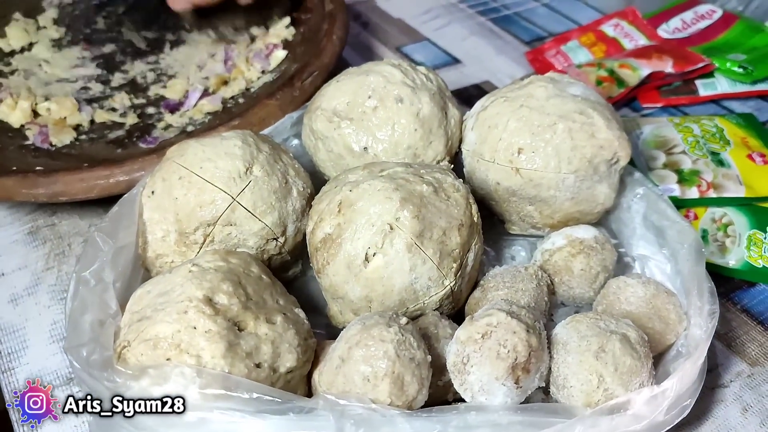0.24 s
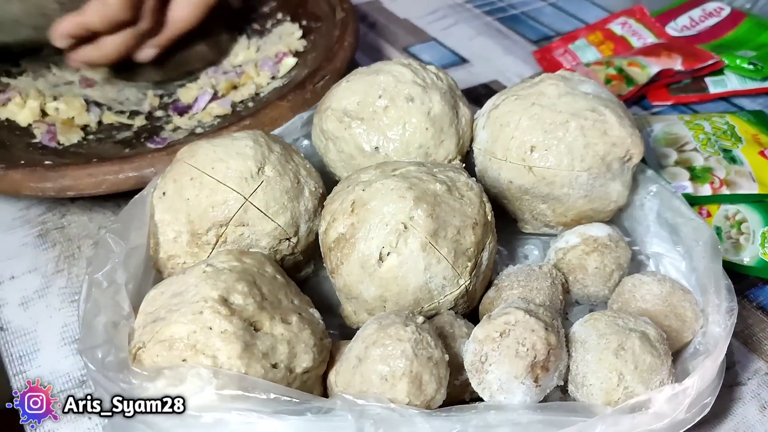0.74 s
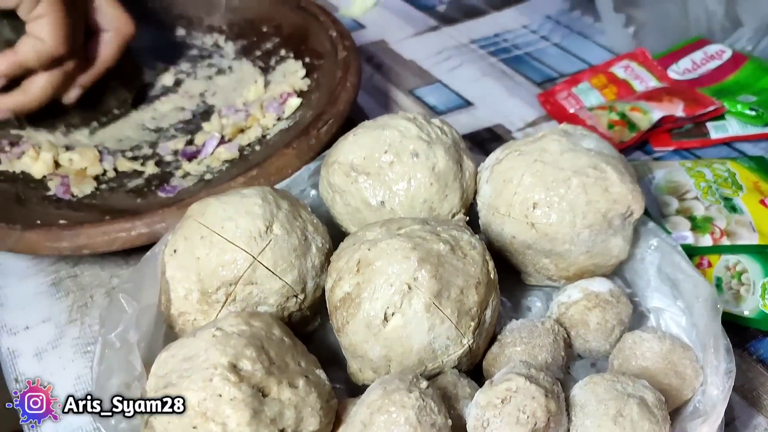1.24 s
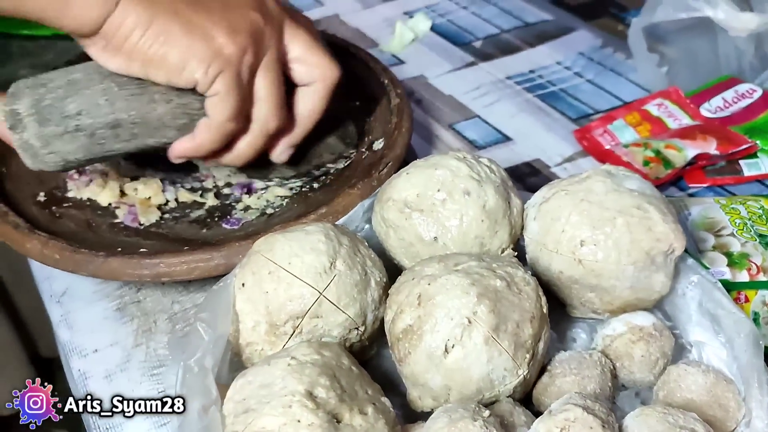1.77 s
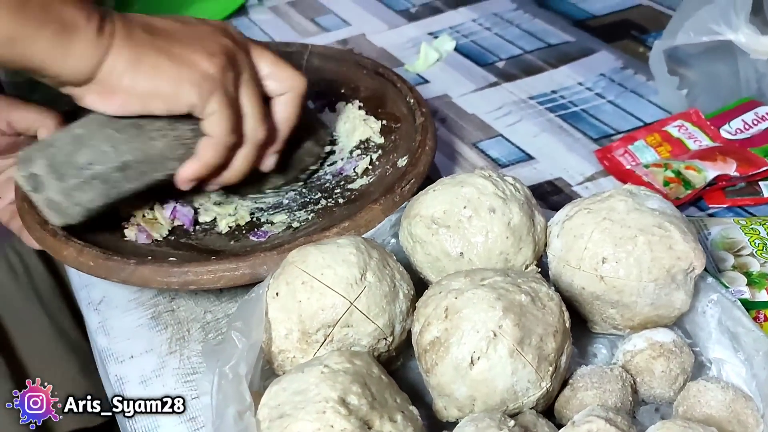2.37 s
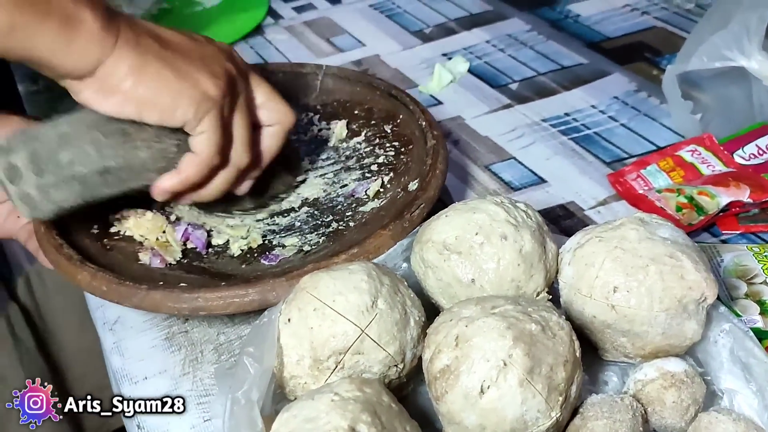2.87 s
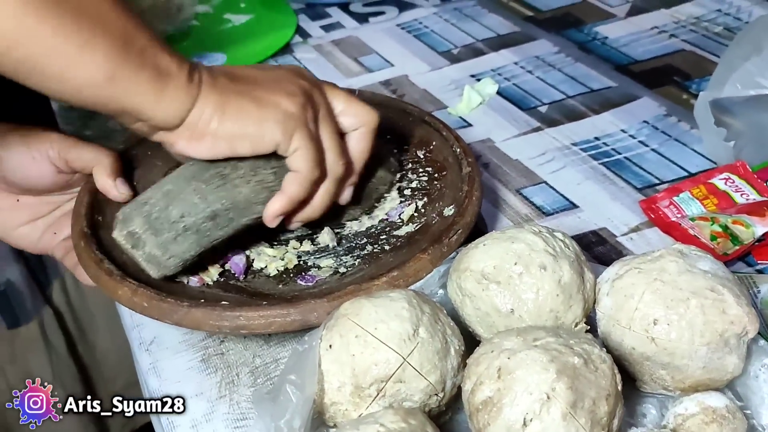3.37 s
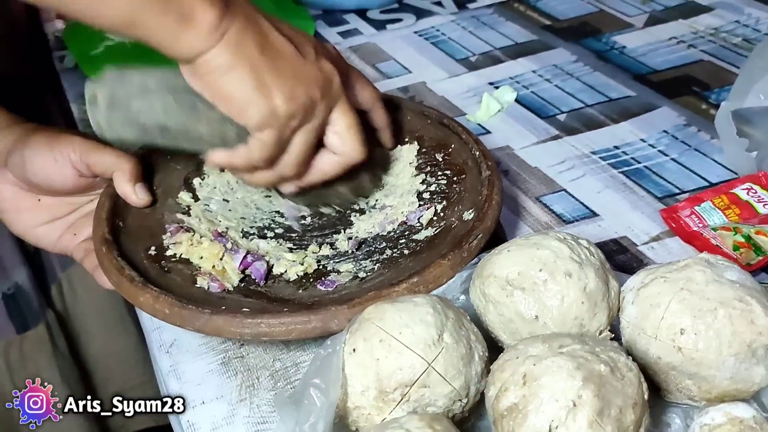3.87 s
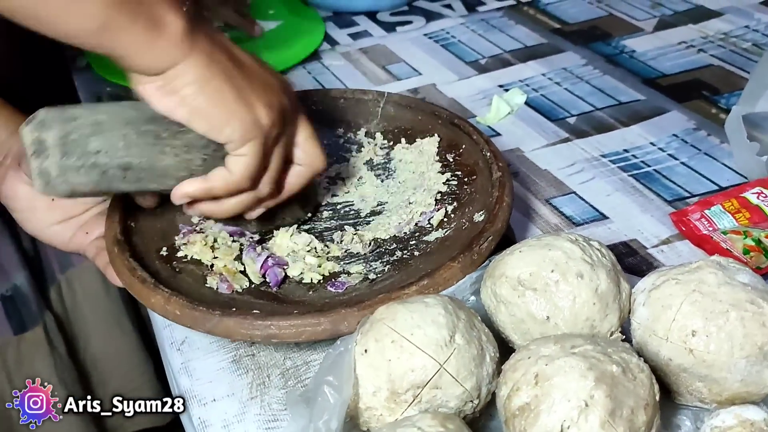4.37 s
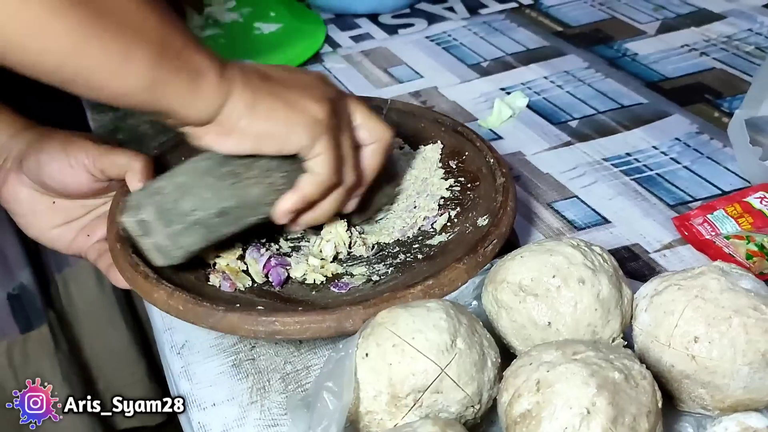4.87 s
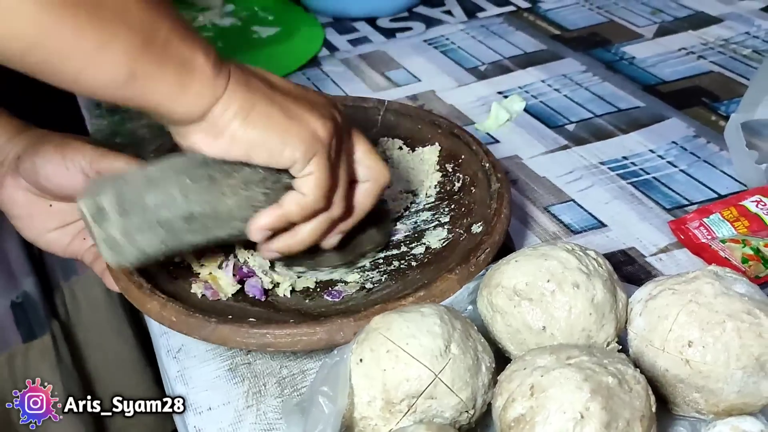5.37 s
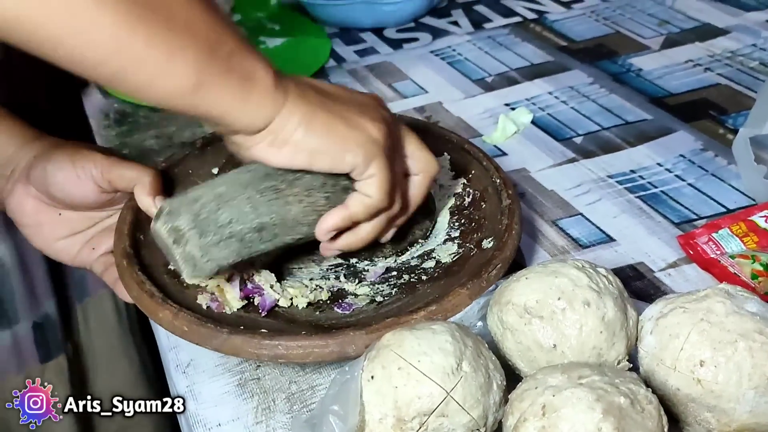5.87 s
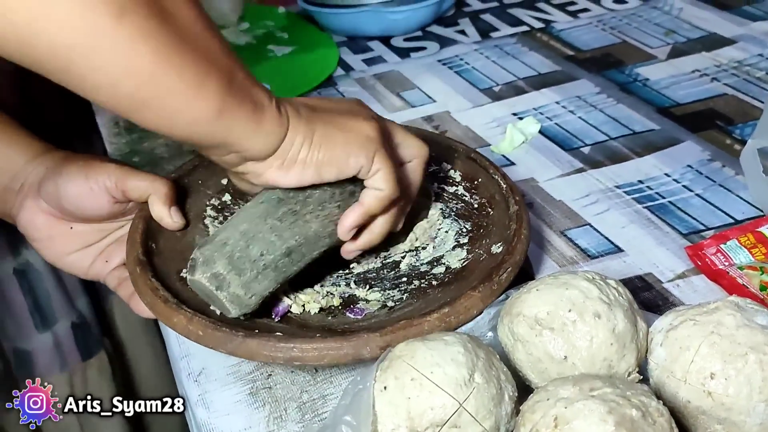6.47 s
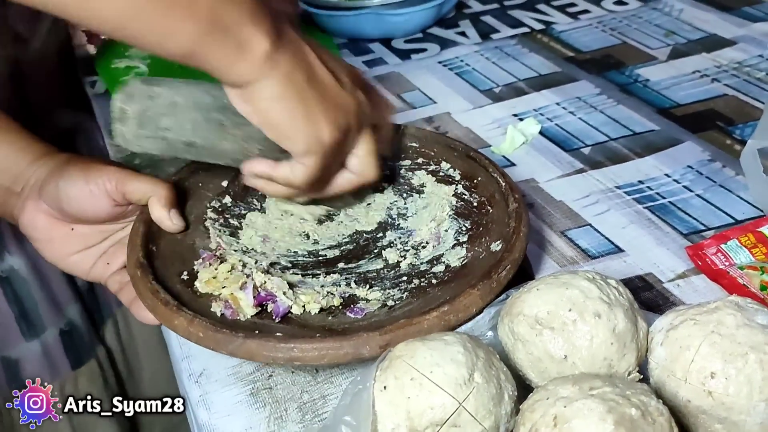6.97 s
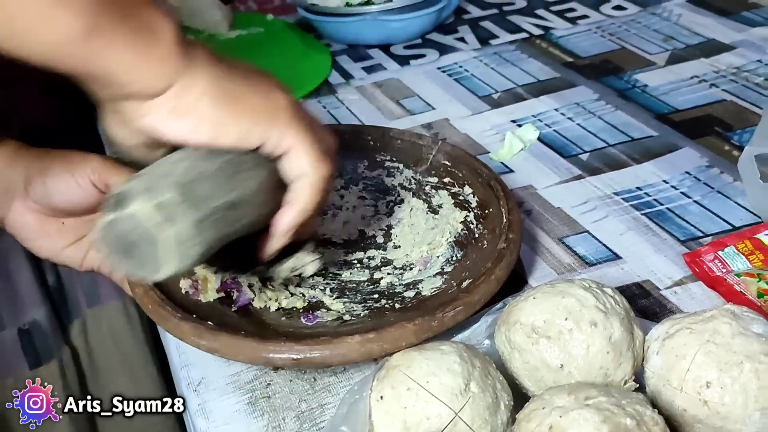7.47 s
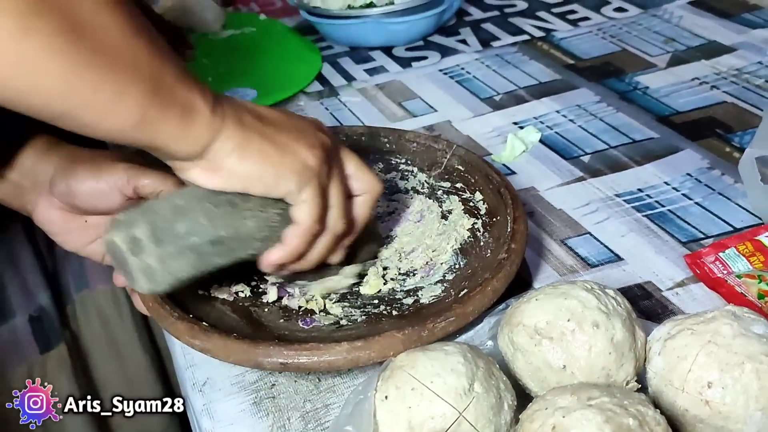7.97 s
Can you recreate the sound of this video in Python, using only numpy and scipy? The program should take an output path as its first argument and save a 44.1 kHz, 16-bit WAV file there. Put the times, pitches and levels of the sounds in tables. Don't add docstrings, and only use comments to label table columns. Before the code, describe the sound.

A stone pestle grinds wet spice paste to and fro in a clay mortar, gritty scrapes with hissing, small knocks and a late heavy thump.

```python
import sys
import numpy as np
from scipy import signal
from scipy.fft import rfft, irfft, next_fast_len
from scipy.io import wavfile
from scipy.ndimage import uniform_filter1d

SR = 44100
rng = np.random.default_rng(int(sys.argv[2]) if len(sys.argv) > 2 else 0)


def transcribe(u):
    v = np.clip(np.atleast_2d(u).T, -1, 1)
    q = np.round(v * 32767).astype(np.int16)
    wavfile.write(sys.argv[1], SR, q)


def linear_from_db(decibels):
    return 10 ** (np.asarray(decibels, float) / 20)


N = 362489

# (time [s], clay ring peak [dB], table thud re ring [dB], crack re ring [dB])
KNOCKS = [(0.342, -22, -1.5, -30), (0.845, -32, -13, -7), (1.4, -9.5, -3, -29), (1.749, -6, -7.5, -7.5),
          (1.879, -22, -16, -3), (2.697, -9.5, -5.5, -19), (2.805, -18.5, -11, -10),
          (3.407, -14.5, -30, -41), (3.571, -28.5, -11, -17), (3.59, -19, -25, -9), (3.777, -6.5, -21, -10),
          (4.009, -21.5, -9.5, -22), (4.19, -15.5, -20, -11), (4.23, -12.5, -7.5, -24),
          (4.55, -26, -33, -19), (4.869, -26.5, -6, -6), (5.225, -13.5, -13, -24), (5.342, -22.5, -36, -18),
          (5.526, -19, -21, -25), (6.111, -21, -3, -16), (6.178, -23, -15, -26), (6.186, -5.5, -8, -13),
          (6.862, -11.5, -12, -41), (7.228, -23.5, -18, 0.5), (7.669, -37, 2, -3), (7.787, -34, 7, -19),
          (7.797, -9.5, 1, -26), (3.787, -14.5, -11, -28), (4.237, -19.5, -8, -22), (1.411, -13, -11, -27)]
# (frequency [Hz], level [dB], T60 [s], left port lead [rad])
MORTAR = [(458, -3, 0.01, 0.9), (605, -9.5, 0.05, -1.78), (763, -11, 0.02, -0.63), (960, -3, 0.018, 2),
          (1130, -0.5, 0.016, 0.87), (1256, 0, 0.038, 1.58), (1371, 10, 0.0095, 1.47),
          (1510, -1, 0.025, 1.5), (1650, -4.5, 0.043, 3), (2166, 0.5, 0.02, 4), (2520, 0, 0.012, 5.5),
          (2940, 1, 0.0065, 17.5)]
# (frequency [Hz], level [dB], T60 [s], left port lead [rad])
TABLE = [(69, -1, 0.19, 0.05), (116, 8.5, 0.14, 0.11), (207, 4, 0.012, 0.069), (227.6, -2, 0.079, 0.04),
         (264.7, -2, 0.047, 0.21), (364.4, -8, 0.065, 0.042), (519, -14, 0.065, 0.03),
         (584.4, -13, 0.1, 0.051), (758, -12.5, 0.04, 0.028)]
GRIT_FADE_DB = 24


def level(x, db):
    return x * linear_from_db(db) / np.sqrt(np.mean(x ** 2))


def bandpass(x, low_hz, high_hz, order=2):
    sos = signal.butter(order, [low_hz, high_hz], "band", fs=SR, output="sos")
    return signal.sosfilt(sos, x)


def colour(x, table):
    hz, db = np.transpose(table)
    size = next_fast_len(N)
    f = np.maximum(np.arange(size // 2 + 1) * SR / size, 1)
    gain = linear_from_db(np.interp(np.log(f), np.log(hz), db))
    return irfft(rfft(x, size) * gain, size)[..., :N]


def flicker(per_s):
    k = int(SR / per_s)
    held = np.repeat(rng.standard_normal(N // k + 1), k)
    return uniform_filter1d(held, k)[:N] * 0.86


def patchy(x, patch_db):
    spectrum = signal.stft(x, nperseg=512)[2]
    clumps = uniform_filter1d(rng.standard_normal(spectrum.shape[1:]), size=7, axis=0)
    clumps = uniform_filter1d(clumps, size=3, axis=1)
    gain = linear_from_db(patch_db * clumps / clumps.std())
    return signal.istft(spectrum * gain, nperseg=512)[1][:, :N]


def even(x):
    even_s = 0.15
    power = uniform_filter1d(np.mean(x ** 2, axis=0), int(even_s * SR))
    return x / np.sqrt(power + 1e-18)


def swells(s, rise_s, fall_s, db, fade_db, rest_db):
    fade_power = 1.477
    s, rise_s, fall_s, db = (np.reshape(v, (-1, 1)) for v in (s, rise_s, fall_s, db))
    step = np.arange(0, N / SR, .002)
    late = step - s
    part = np.abs(late) / np.where(late < 0, rise_s, fall_s)
    power = linear_from_db(rest_db) ** 2 + np.sum(linear_from_db(db - fade_db * part ** fade_power) ** 2, axis=0)
    return np.interp(np.arange(N) / SR, step, np.sqrt(power))


def ticks(per_s, scatter_db):
    hit = rng.random(N) < per_s / SR
    size_db = scatter_db * np.minimum(rng.exponential(size=N), 4)
    return hit * rng.standard_normal(N) * linear_from_db(size_db)


def soften(force, ms):
    return np.convolve(force, np.hanning(int(ms * SR / 1000) + 3))[:len(force)]


def ring(force, modes, patch_db=None):
    out = 0
    for hz, db, t60, lead in modes:
        pole = np.exp(2j * np.pi * hz / SR - np.log(1000) / (t60 * SR))
        if patch_db:
            db = db + patch_db * flicker(14)
            lead = lead + min(hz / 2400, 1.2) * flicker(8.3)
        z = signal.lfilter([1], [1, -pole], linear_from_db(db) * force)
        out = out + np.array([(z * np.exp(1j * lead)).imag, z.imag])
    return out


def blow(force, modes, chance, peak_db, in_step=3):
    signs = np.sign(chance[-len(modes):] + in_step)
    sizes = signs * linear_from_db(3 * chance[:len(modes)])
    sound = sum(size * ring(force, [mode]) for size, mode in zip(sizes, modes))
    return sound * linear_from_db(peak_db) / np.abs(sound.mean(axis=0)).max()


def add(out, sound, s):
    i = int(s * SR)
    out[:, i:i + sound.shape[1]] += sound[:, :N - i]


def kitchen():
    # (frequency [Hz], density [dB per Hz])
    air_spectrum = [(12, -14), (20, 11), (146, 5), (234, -6), (328, -16), (642, -20), (718, -34),
                    (780, -16), (976, -36), (1440, -22), (1760, -24), (14700, -25.5), (16000, -13.5)]
    kitchen_db = -51
    air = colour(rng.standard_normal((3, N)), air_spectrum)
    bass = signal.sosfilt(signal.butter(2, 500, fs=SR, output="sos"), air)
    treble = air - bass
    swell = linear_from_db(1.2 * flicker(6))
    return swell * linear_from_db(kitchen_db) * (bass[2] + treble[:2]) / treble.std()


def sway():
    # (time [s], level [dB])
    bass_swells = [(0.04, -27), (0.35, -40), (0.7, -33.5), (1.09, -37), (1.4, -48), (1.53, -38.5), (1.83, -39),
                   (2.06, -32.5), (2.35, -43.5), (2.5, -49), (2.73, -37.5), (2.87, -41), (3.43, -39), (3.8, -45),
                   (4.28, -41), (4.95, -39.5), (5.08, -44), (5.27, -35.5), (5.65, -35.5), (6.19, -35), (6.4, -45),
                   (6.57, -39), (7.8, -30)]
    rise_s, fall_s, fade_db, rest_db, sway_db = 0.076, 0.1, 9.5, -46.5, 2
    rumble = bandpass(rng.standard_normal(N), 20, 55, order=3)
    s, db = np.transpose(bass_swells)
    return swells(s, rise_s, fall_s, db + sway_db, fade_db, rest_db) * level(rumble, -1.4)


def pops():
    # (time [s], peak [dB], lower treble re peak [dB])
    snaps = [(0.143, -21, -27), (1.751, -43, 4), (1.8798, -10, -3), (2.699, -38, 18), (2.668, -34.5, 10),
             (2.77, -25, -17), (2.8105, -24, -8), (3.1338, -24, -16), (4.6743, -27, -16),
             (4.686, -13.5, -23), (4.8673, -26, -5), (4.9432, -32, -7), (4.9635, -17, -12),
             (5.227, -27.5, 20), (5.697, -33, -10), (5.7116, -19.5, -10), (6.1857, -20, 22),
             (6.5803, -14, -22), (7.018, -12.5, -13), (7.0527, -27, 13), (7.228, -23.5, 14),
             (7.669, -35, -11), (7.7505, -15.5, -3), (7.7675, -14, 1), (7.9563, -21, -2)]
    out, t = np.zeros((2, N)), np.arange(SR // 50) / SR
    for s, peak_db, body_db in snaps:
        burst = rng.standard_normal((2, len(t))) * np.exp(-t / 0.001)
        top = bandpass(burst, 7400, 14000)
        body = bandpass(burst, 2380, 3900)
        add(out, 0.87 * linear_from_db(peak_db) * (top + linear_from_db(body_db) * body), s)
    return out


def thumps():
    # (time [s], peak [dB], push length [ms])
    rocks = [(0.205, -16, 1.92), (0.267, -25.5, 4.1), (0.294, -30, 3.6), (0.349, -13.5, 3.27),
             (0.534, -29, 4.8), (0.906, -25.5, 3.3), (1.18, -25.5, 3.5), (1.567, -21.5, 2.56),
             (1.616, -27, 4.2), (2.308, -27.5, 4.8), (2.594, -28, 3.5), (3.262, -29, 5.2),
             (4.455, -35.5, 3.1), (4.834, -30.5, 4.9), (5.102, -30.5, 5), (6.03, -28.5, 4.2),
             (6.74, -23.5, 4.9), (7.788, -2.5, 5.4), (7.81, -11.5, 3.2), (7.834, -13.5, 4.8)]
    held_share = .7
    rebound, rebound_pushes = 0.67, 1.124
    out, t = np.zeros((2, N)), np.arange(SR // 4) / SR
    held = [(hz, db, t60 * held_share, lead) for hz, db, t60, lead in TABLE]
    for s, peak_db, push_ms in rocks:
        chance = rng.standard_normal(len(t))
        push = np.diff(soften(t == 0, max(push_ms, .5)), prepend=0)
        push = push - rebound * np.roll(push, int(rebound_pushes * push_ms * SR / 1000))
        rattle = soften(chance * np.exp(-t / 0.024), 1.67)
        sound = blow(-push, held, chance, peak_db)
        sound += blow(rattle, MORTAR, chance, peak_db - 16.5, in_step=.3)
        add(out, sound, s)
    return out


def knocks():
    spread_ms, spread_per_crack_ms, crack_ms = 5, -0.14, 3.45
    thud_late_s, thud_bass_db = 0.00302, -13
    out, t = np.zeros((2, N)), np.arange(SR // 7) / SR
    board = [(hz, db + thud_bass_db * (hz < 150), *rest) for hz, db, *rest in TABLE]
    for s, peak_db, thud_db, crack_db in KNOCKS:
        spray_ms = max(spread_ms + spread_per_crack_ms * crack_db, .3)
        chance = rng.standard_normal((4, len(t)))
        contacts = np.exp(-t * 1000 / spray_ms) * chance[0] * (np.abs(chance[1]) > 2.3)
        contacts[0] = -2.4
        sound = blow(soften(contacts, 0.41), MORTAR, chance[1], peak_db, in_step=.3)
        thud = np.diff(soften(t == t[int(thud_late_s * SR)], 1.92), prepend=0)
        sound += blow(-thud, board, chance[2], peak_db + thud_db)
        late = np.maximum(t - crack_ms / 1000, 0)
        snap = np.exp(-late / 0.0022) + 0.025 * np.exp(-late / 0.031)
        snap *= np.minimum(late / 0.00082, 1)
        crack = 1.54 * bandpass(chance[2:], 2000, 8000) * snap
        add(out, sound + crack * linear_from_db(peak_db + crack_db), s)
    return out


def effort():
    # (fastest [s], speed-up [s], slow-down [s], grit on clay [dB], paste hiss [dB])
    strokes = [(0.47, 0.079, 0.068, -36, -41), (0.853, 0.049, 0.047, -34, -39.5),
               (1.232, 0.082, 0.1, -38, -41.5), (1.909, 0.074, 0.084, -36.5, -42.5),
               (2.279, 0.092, 0.065, -40, -43.5), (2.825, 0.061, 0.071, -34, -38.5),
               (3.215, 0.067, 0.097, -44, -41.5), (3.606, 0.069, 0.084, -38.5, -39),
               (4.042, 0.14, 0.11, -40.5, -39), (4.416, 0.092, 0.062, -49, -38.5),
               (4.768, 0.08, 0.056, -41, -38), (5.348, 0.077, 0.046, -35.5, -40.5),
               (5.72, 0.071, 0.06, -35, -40.5), (6.299, 0.095, 0.111, -38, -41),
               (6.703, 0.072, 0.071, -37.5, -39), (7.061, 0.053, 0.051, -30.5, -38.5),
               (7.289, 0.078, 0.098, -39.5, -42.5), (7.799, 0.1, 0.13, -38.5, -42),
               (8.128, 0.064, 0.068, -42.5, -40),
               (0.071, 0.096, 0.082, -38, -42.5), (0.671, 0.12, 0.065, -43.5, -44.5),
             (1.045, 0.15, 0.063, -37.5, -42.5), (1.398, 0.091, 0.12, -41, -43),
             (2.077, 0.088, 0.1, -37, -42), (2.431, 0.1, 0.075, -50, -46),
             (3.019, 0.072, 0.069, -46.5, -42.5), (3.411, 0.078, 0.074, -36, -40),
             (3.783, 0.059, 0.087, -33, -41), (4.219, 0.13, 0.096, -35.5, -41),
             (4.584, 0.068, 0.067, -34.5, -39.5), (4.949, 0.1, 0.061, -37, -40.5),
             (5.525, 0.086, 0.093, -36, -41.5), (5.859, 0.053, 0.084, -38, -45.5),
             (6.511, 0.077, 0.078, -38, -42.5), (6.871, 0.083, 0.098, -39.5, -44.5),
             (7.182, 0.21, 0.039, -42.5, -44.5), (7.969, 0.048, 0.059, -49, -40.5)]
    # (time [s], grit [dB], paste [dB])
    landings = [
        (0.354, -65, -52),
        (1.767, -40, -49.5),
        (2.711, -39, -65),
        (5.238, -48, -57),
        (6.194, -31.5, -45),
    ]
    # (time [s], paste [dB])
    lifts = [
        (1.572, -55),
        (2.55, -48.5),
        (5.088, -52),
        (5.98, -50.5),
        (7.45, -51),
    ]
    skid_rise_s, skid_fall_s, skid_early_s = 0.0076, 0.1, 0.01
    drag_s, lift_s, drag_grit_db = .24, 0.048, -53
    paste_fade_db, table_fade_db = 11, 17.5
    grit_gain_db, paste_gain_db, grit_rest_db, table_rest_db = 4.5, 1.5, -63.5, -57
    table_db, table_per_grit = -37.5, 0.46
    shake_db, shake_s = -8.5, 0.051

    skids = [(s - skid_early_s, skid_rise_s, skid_fall_s, grit_db, paste_db)
             for s, grit_db, paste_db in landings]
    drags = [(s, drag_s, lift_s, paste_db + drag_grit_db, paste_db) for s, paste_db in lifts]
    s, rise_s, fall_s, grit_db, paste_db = np.transpose(strokes + skids + drags)
    grit = swells(s, rise_s, fall_s, grit_db + grit_gain_db, GRIT_FADE_DB, grit_rest_db)
    paste = swells(s, rise_s, fall_s, paste_db + paste_gain_db, paste_fade_db, -90)
    push_db = table_db + table_per_grit * (grit_db + 40.5)
    push = swells(s, rise_s, fall_s, push_db, table_fade_db, table_rest_db)
    hit_s, peak_db, thud_db, _ = np.transpose(KNOCKS)
    shake = swells(hit_s + 0.0023, 0.003, shake_s, peak_db + thud_db + shake_db, table_fade_db, -90)
    return grit, paste, np.hypot(push, shake)


def grinding():
    # (frequency [Hz], density [dB per Hz])
    paste_spectrum = [(880, -34), (1500, -6), (1870, -12.5), (2590, -10), (3250, -12.5), (3480, -9.5),
                      (5830, -11), (8490, -9.5), (11900, -9), (14900, -14.5), (16000, -16)]
    # (time [s], level [dB])
    seed_bursts = [(.455, -33.5), (.855, -22), (1.231, -22), (1.37, -28.5), (2.275, -41), (2.815, -25),
                   (3.225, -34), (3.595, -23), (3.99, -29), (4.014, -16.5), (4.049, -23.5), (4.87, -32.5),
                   (5.33, -29), (5.5, -46), (7.045, -25.5)]
    seed_rise_s, seed_fall_s, seed_gain_db = 0.021, 0.031, 3
    grit, paste, push = effort()
    catch = flicker(80)

    contacts = linear_from_db(5.4 * catch) * soften(ticks(2600, 1.7), .12)
    clay = grit * even(ring(contacts, MORTAR, patch_db=8.0))
    clay = level(clay, -0.18) * np.sqrt(np.mean(grit ** 2))

    seed_s, seed_db = np.transpose(seed_bursts)
    seeds = swells(seed_s, seed_rise_s, seed_fall_s, seed_db + seed_gain_db, GRIT_FADE_DB, -90)
    crush = np.array([ticks(830, 3.0) for port in range(2)])
    crush = level(patchy(bandpass(crush, 1900, 4500), 5.6), -10.0)
    crunch = np.hypot(grit, seeds) * linear_from_db(3.05 * catch) * crush

    grains = ticks(5000, 6.0)
    hiss = 0.38 * np.array([np.roll(grains, 4), grains]) / grains.std()
    hiss = hiss + rng.standard_normal((2, N))
    hiss = level(patchy(colour(hiss, paste_spectrum), 2.8), 0)
    hiss = paste * linear_from_db(0.44 * catch + 1.56 * flicker(300) + 3.5) * hiss

    rub = linear_from_db(2.7 * catch) * np.diff(rng.standard_normal(N + 1))
    table = push * even(ring(rub, TABLE, patch_db=9.5))
    table = level(table, -1.07) * np.sqrt(np.mean(push ** 2))
    return clay + crunch + hiss + table


def scene():
    room_t60_s, room_db = 0.15, -16.5
    near = grinding() + knocks() + thumps() + pops()
    t = np.arange(SR // 3) / SR
    walls = rng.standard_normal((2, len(t))) * linear_from_db(-60 * t / room_t60_s) * (t > .003)
    walls = bandpass(walls, 800, 6000)
    walls *= linear_from_db(room_db) / np.sqrt(np.sum(walls ** 2, axis=1, keepdims=True))
    echo = signal.fftconvolve(near, walls, axes=1)[:, :N]
    return near + echo + kitchen() + sway()


def top_cut(x):
    return signal.sosfilt(signal.butter(12, 16450, fs=SR, output="sos"), x)


def record(dry):
    # (frequency [Hz], left minus right [dB])
    port_tilt = [(60, -3), (110, -2), (200, 1), (380, 1.5), (700, 0), (1290, -0.5), (2380, -2),
                 (4400, -4.5), (8120, -8), (15000, -6.5)]
    # (frequency [Hz], level [dB])
    treble_dip = [(7600, 0), (8500, -7.5), (9300, -3.5)]
    top_hz = 15550
    left = colour(dry[0], [(hz, db / 2) for hz, db in port_tilt])
    right = colour(dry[1], [(hz, -db / 2) for hz, db in port_tilt])
    ports = np.clip(colour(np.array([left, right]), treble_dip), -.95, .95)
    cut = signal.sosfilt(signal.ellip(10, .2, 60, top_hz, fs=SR, output="sos"), ports)
    return top_cut(cut)


dry = scene()
out = record(dry)
transcribe(out)
```